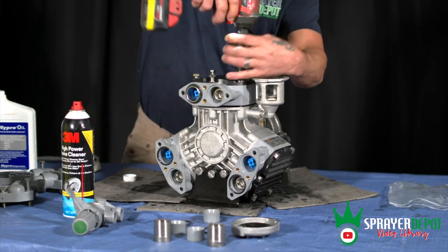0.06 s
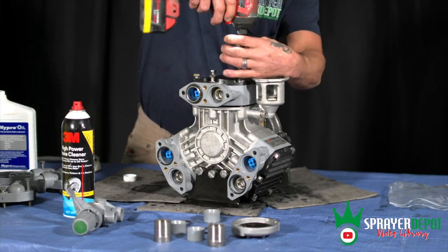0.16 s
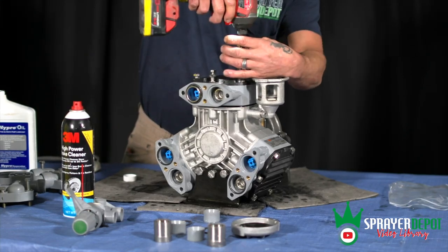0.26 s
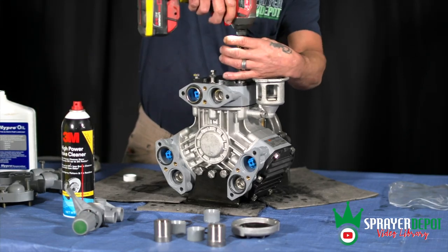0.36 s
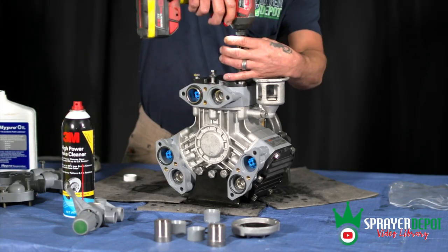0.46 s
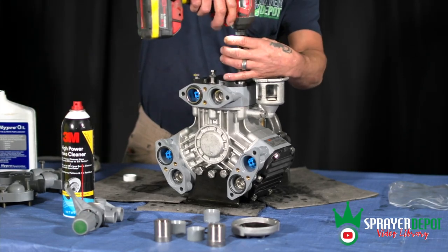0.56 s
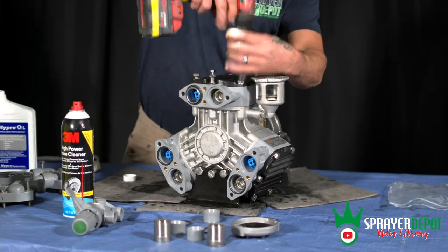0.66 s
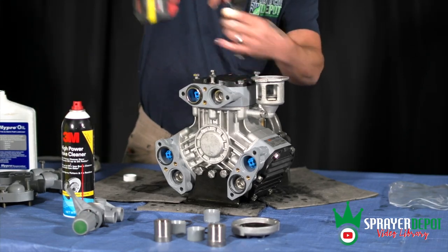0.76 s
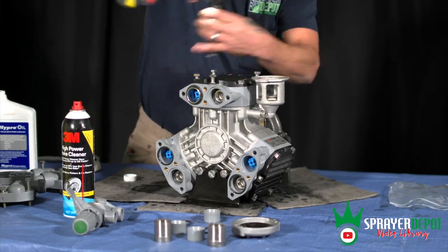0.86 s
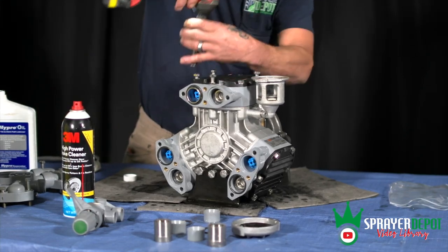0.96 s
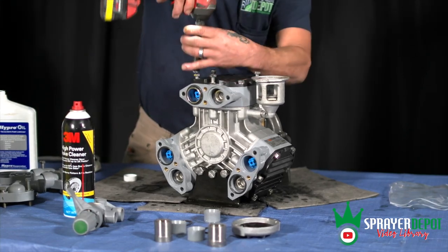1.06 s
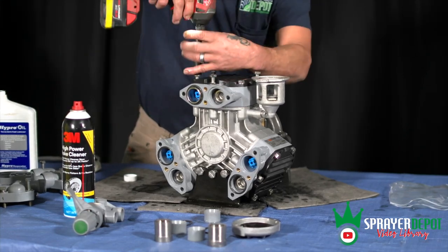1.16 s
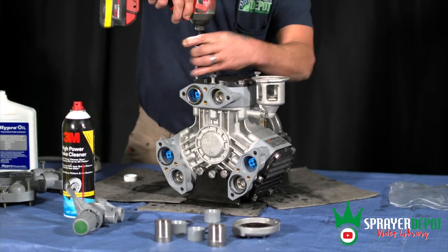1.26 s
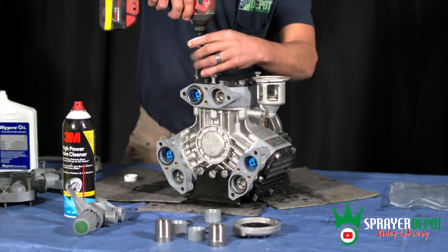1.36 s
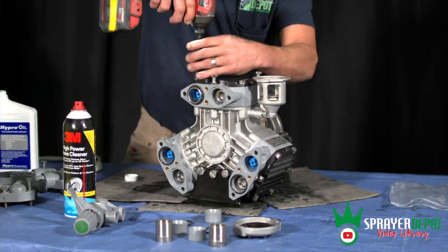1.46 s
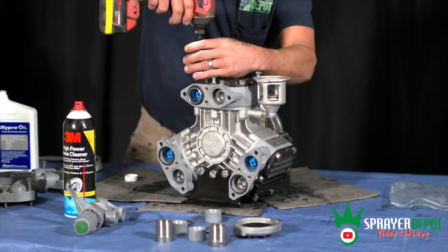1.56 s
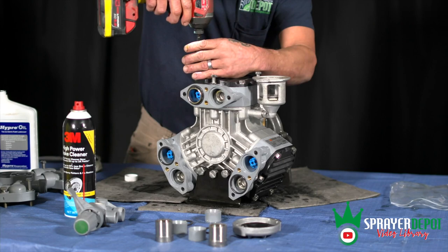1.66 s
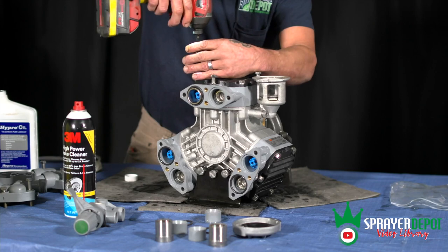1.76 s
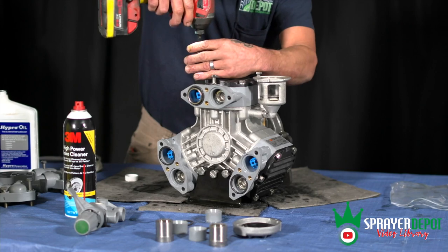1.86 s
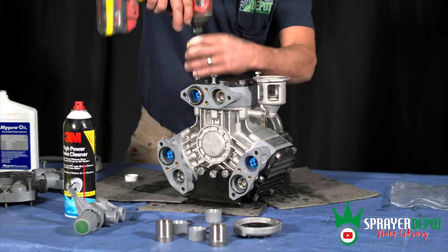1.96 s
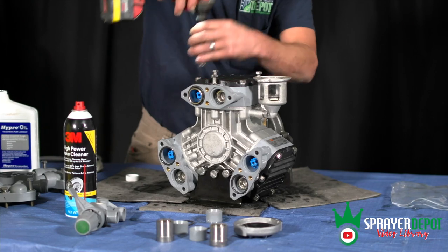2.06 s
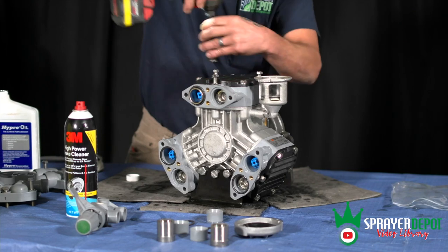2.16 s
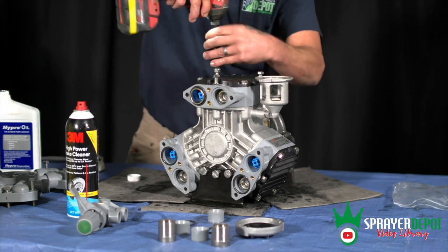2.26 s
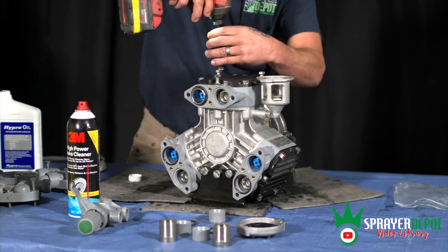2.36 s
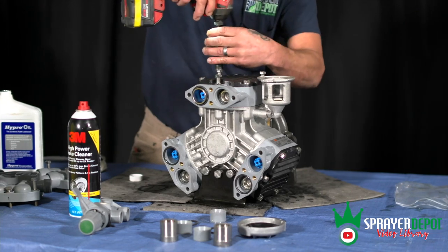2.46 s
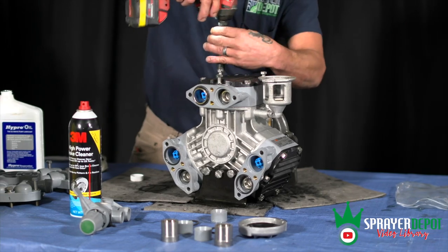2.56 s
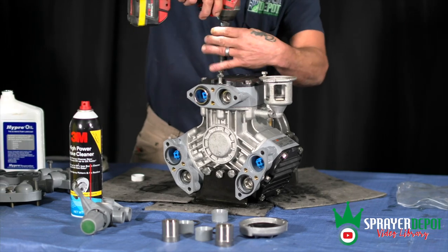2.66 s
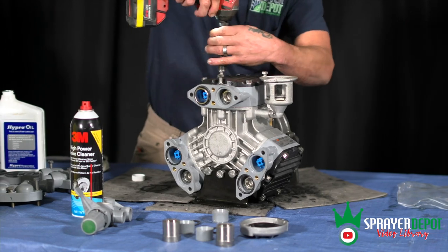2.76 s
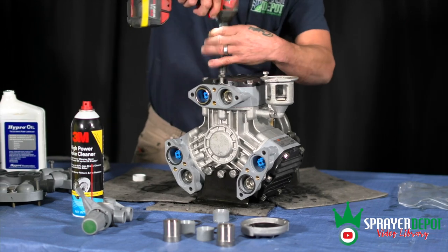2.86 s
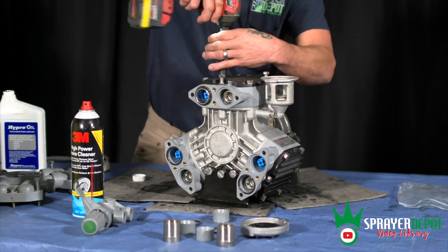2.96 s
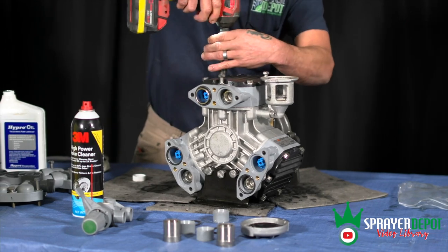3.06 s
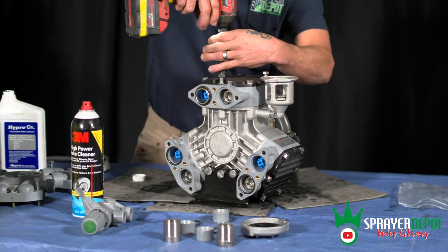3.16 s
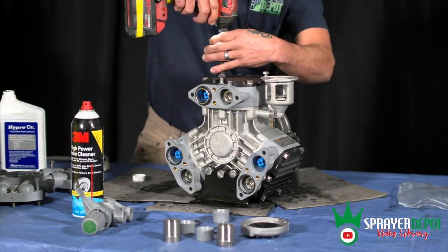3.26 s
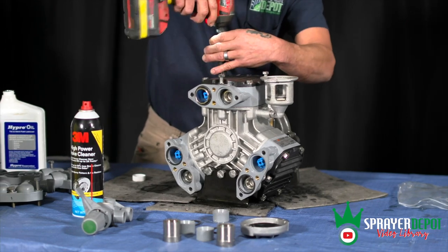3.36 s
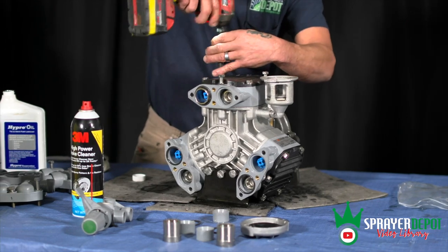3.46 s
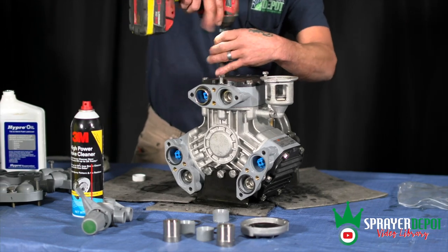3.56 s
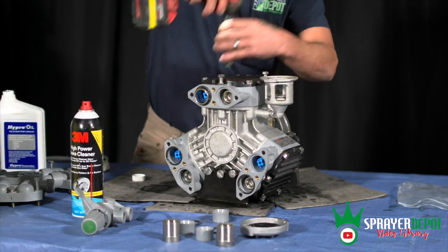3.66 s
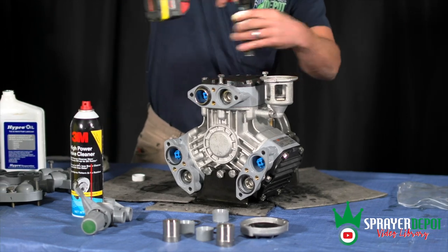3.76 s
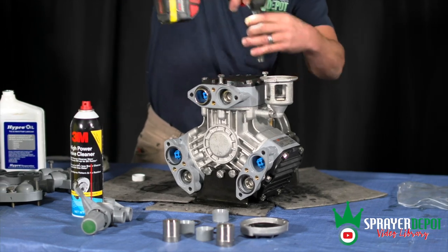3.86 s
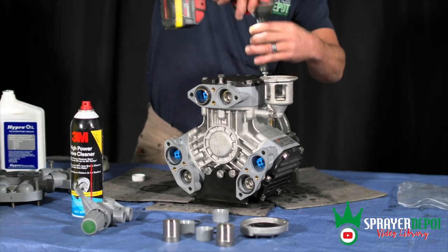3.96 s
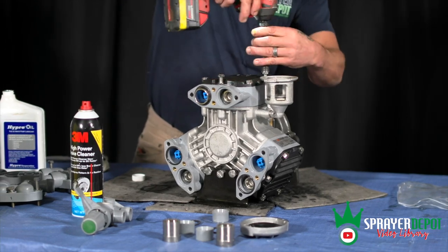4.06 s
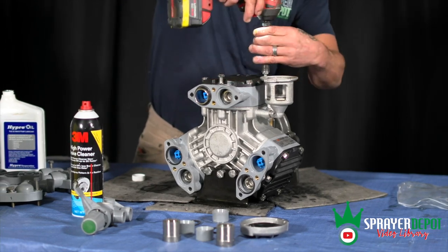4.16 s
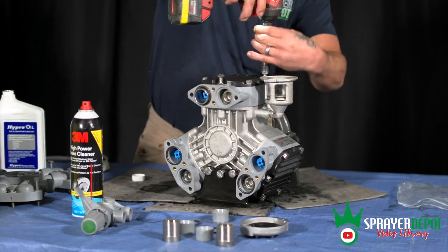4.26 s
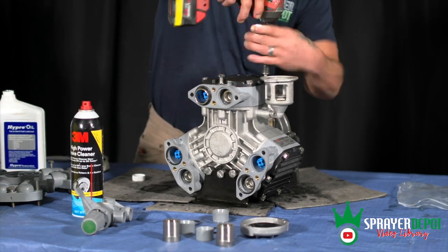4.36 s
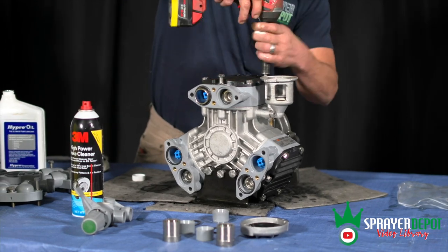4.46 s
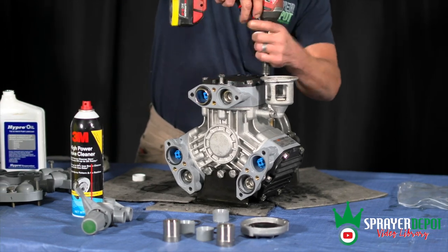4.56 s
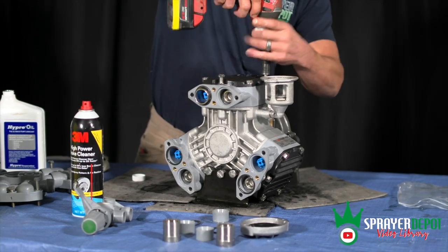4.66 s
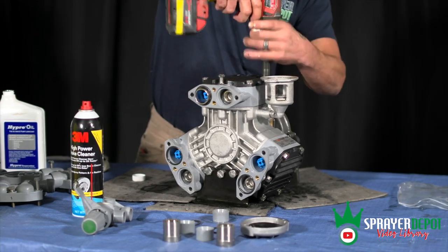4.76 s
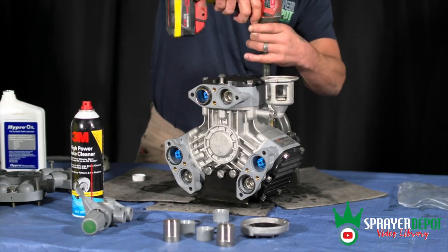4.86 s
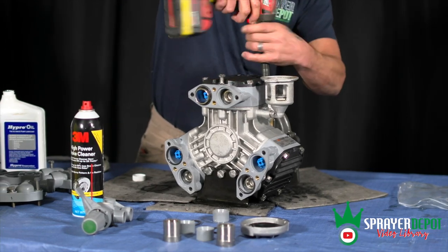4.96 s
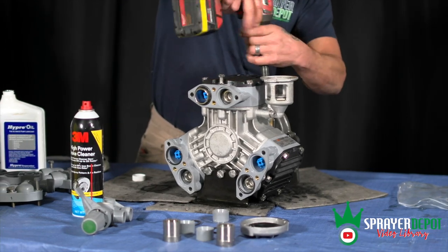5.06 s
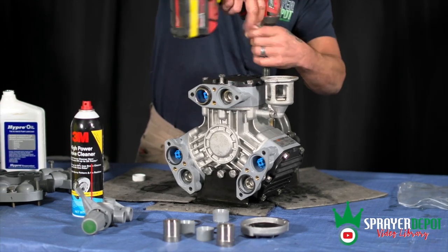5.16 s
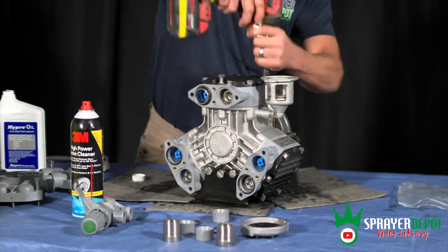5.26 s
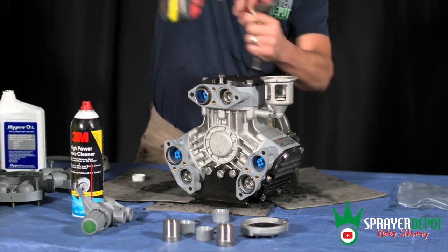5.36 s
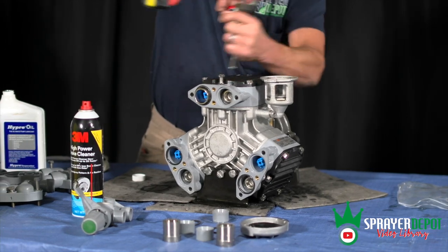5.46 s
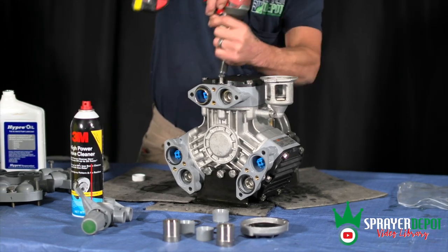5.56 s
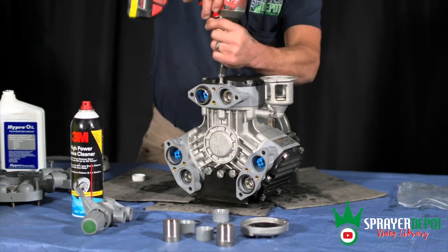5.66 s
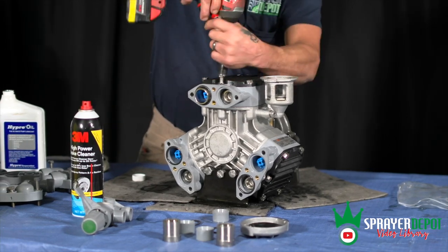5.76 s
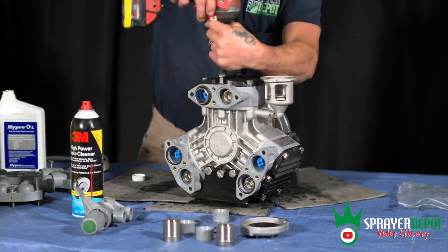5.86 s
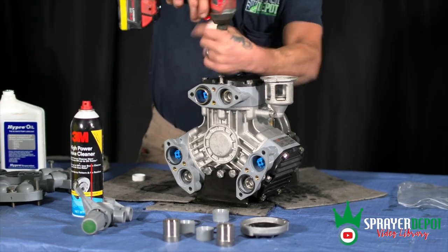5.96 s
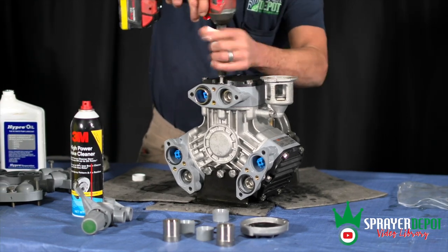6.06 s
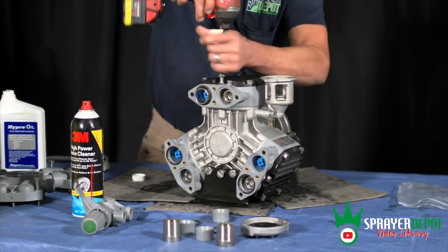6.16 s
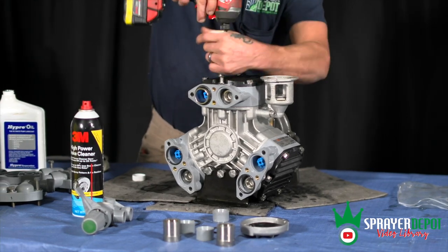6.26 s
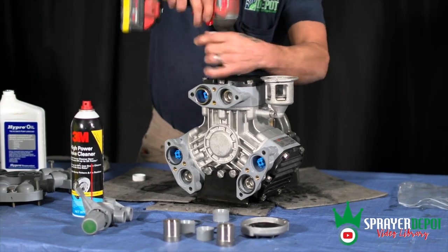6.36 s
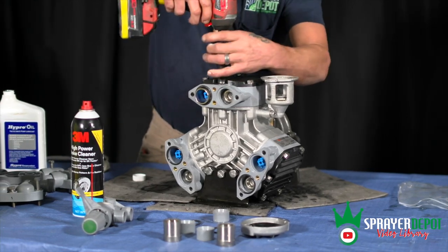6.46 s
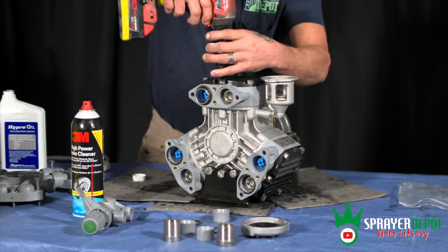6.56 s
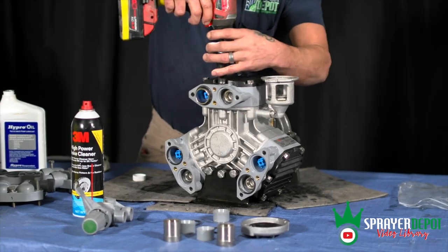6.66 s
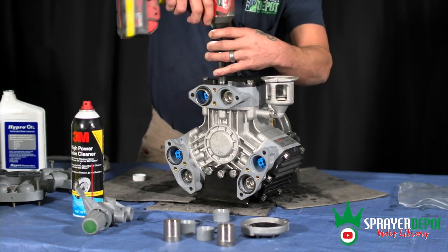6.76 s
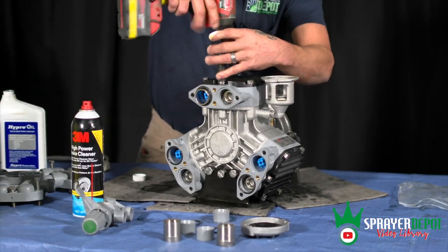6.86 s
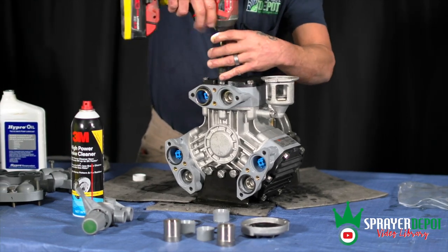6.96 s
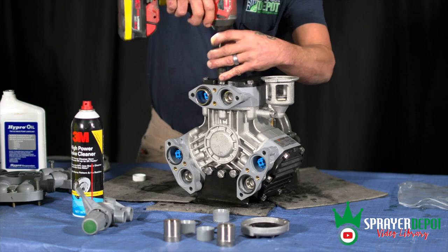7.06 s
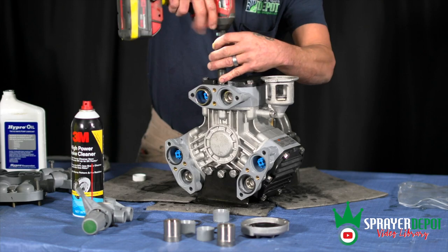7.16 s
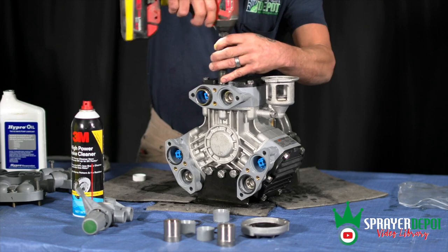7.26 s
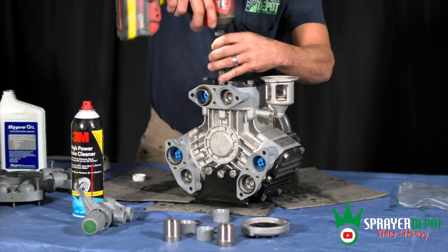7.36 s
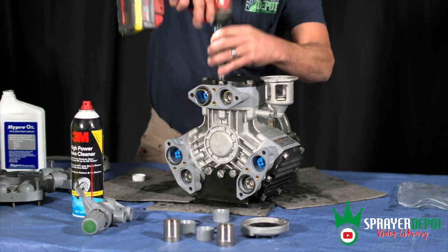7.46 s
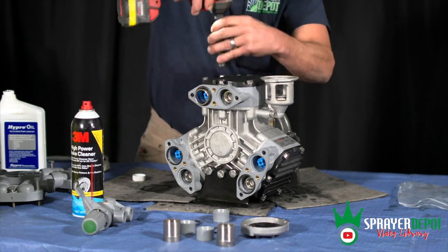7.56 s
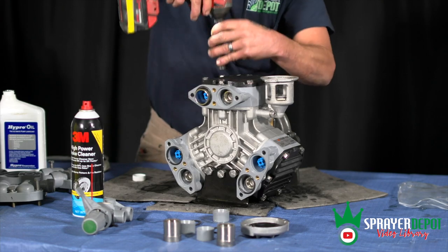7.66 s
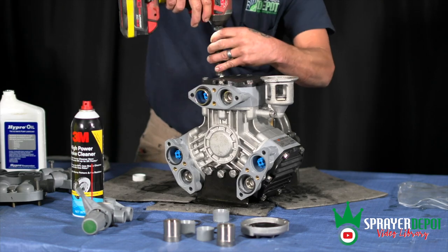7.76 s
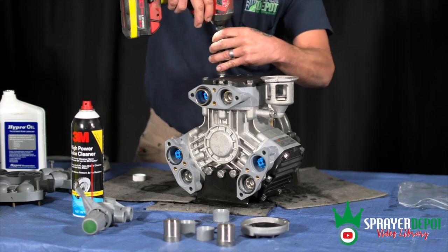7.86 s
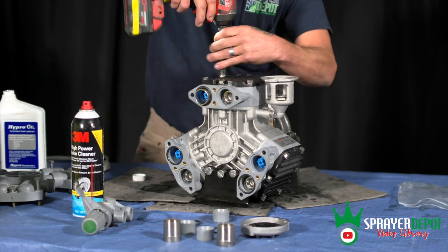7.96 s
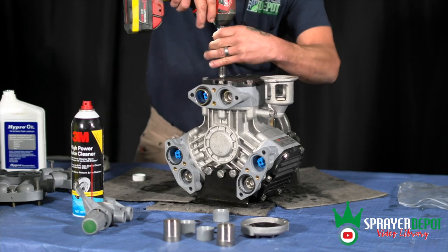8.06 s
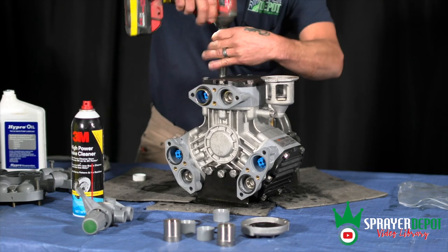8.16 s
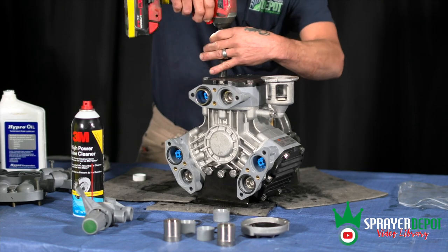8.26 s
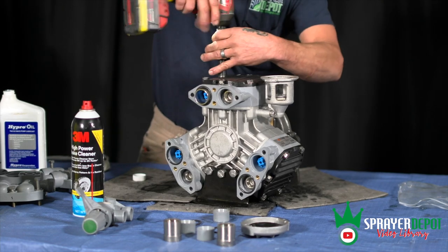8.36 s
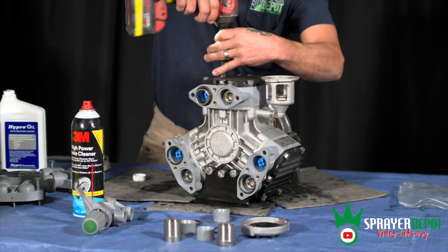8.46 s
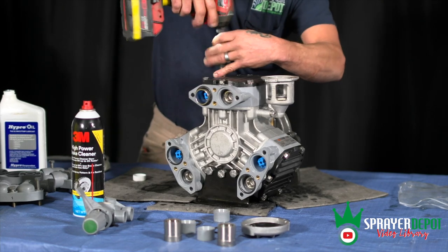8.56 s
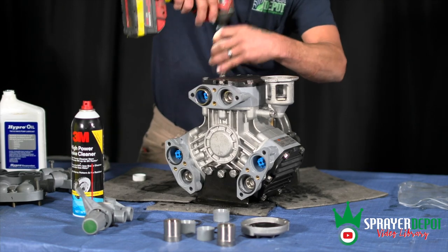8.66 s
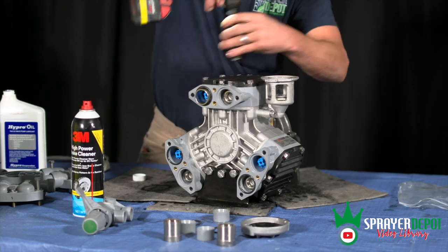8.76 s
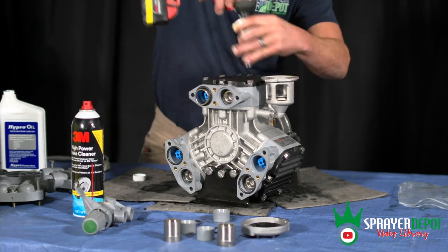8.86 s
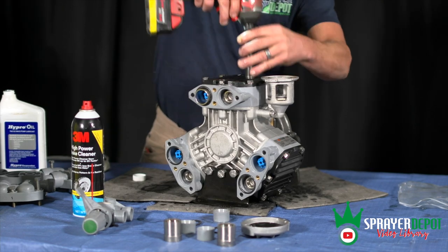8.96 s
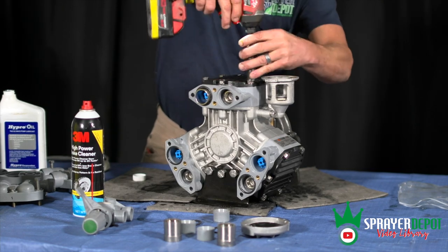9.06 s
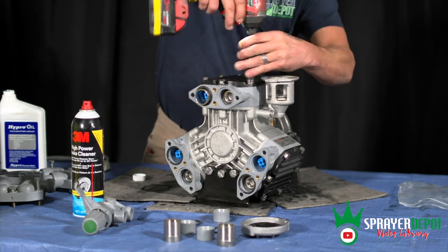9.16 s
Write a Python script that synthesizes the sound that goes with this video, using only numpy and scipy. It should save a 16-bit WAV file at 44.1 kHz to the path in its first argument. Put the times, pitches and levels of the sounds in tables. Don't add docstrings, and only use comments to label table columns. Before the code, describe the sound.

A cordless impact driver works on bolts of a cast metal pump. Each brief pull gives a thin high whistle, a rising motor and gear whir, then a rapid burst of bright steel blows that stops abruptly. Socket clicks and small taps fill the gaps. The early bursts vary from faint to hard, later ones are mostly loud. Close microphone in a large hard-walled workshop, with short echo, slight clipping and faint airflow.

```python
import sys
import numpy as np
from scipy import signal
from scipy.fft import rfft, irfft, next_fast_len
from scipy.io import wavfile

SR = 44100
rng = np.random.default_rng(int(sys.argv[2]) if len(sys.argv) > 2 else 0)


def to_linear_factor(level_db):
    exponent = np.asarray(level_db, float) / 20
    return 10 ** exponent


def materialize(psi):
    bounded = np.clip(np.atleast_2d(psi).T, -1, 1)
    quanta = np.round(bounded * 32767).astype(np.int16)
    wavfile.write(sys.argv[1], SR, quanta)


N = 407043

# f/Hz, level/dB per Hz
AIR = [(15, -56.5), (25, -25), (76, -16), (146, -15.5), (225, -10.5), (495, -10), (552, -8.5), (1000, -12),
       (1210, -22), (1320, -15), (2260, -21.5), (6010, -34.5), (15100, -44), (16400, -52)]
# f/Hz, width/Hz, level/dB rms
FAN_TONES = [(93, 15, -66), (234.3, 15, -65.5), (272.3, 12, -64), (530, 18, -71.5)]
AIR_DB = -56

# f/Hz, t60/s
ROOM_T60 = [(200, 0.21), (530, 0.72), (1390, 0.59), (3680, 0.57), (9700, 0.43)]
# f/Hz, level/dB
ROOM_TONE = [(150, -7), (500, 3), (1500, 5), (4000, 0), (9000, 1), (15000, 1)]
# delay/s, level/dB
BENCH_ECHOES = [(.0034, -5), (.0062, -16)]
PATH_SHIFT_HZ = 90

# t/s, peak/dB, dull part/dB, bright part/dB
TOUCHES = [(0.7407, -33.5, -18, -1.5), (1.1306, -24.5, -11, -10), (1.3945, -24, -9, -8),
           (1.6792, -24, -14, -16), (2.2915, -30, 7.5, 4.5), (2.2954, -21.5, -20, -36), (2.488, -42, 0, -6),
           (4.0285, -30.5, 1.5, 2.5), (4.347, -45, -9.5, -3.5), (4.355, -33, -0.5, -8),
           (4.3653, -43, 7, -19), (4.451, -40, -14.5, -5.5), (5.6374, -40.5, -14, -3.5),
           (5.6546, -35.5, -5, -17), (5.9356, -39, 0.5, 0), (6.2205, -40.5, -9, -19),
           (6.2495, -46.5, 5.5, -25), (6.4101, -21, 3.5, -5.5), (7.796, -25.5, -4, -14),
           (7.9378, -31, -2.5, -9), (8.0283, -40, -10.5, -37.5), (8.107, -48.5, -19, -20),
           (8.2022, -44, -2, -17), (8.2167, -21, -2.5, -5), (8.2183, -13.5, -26, -32), (8.567, -14, -5, 1),
           (9.046, -32.5, 1.5, 3), (9.2244, -25, -14.5, 0.5)]
# t/s, f/Hz, level/dB, t60/s
RINGS = [(1.131, 1523, -43, .05), (1.131, 3747, -44, .03), (1.131, 5050, -40, .02),
         (2.296, 3150, -31, .012), (4.029, 1378, -48, .03), (4.029, 6420, -52, .03), (4.029, 7106, -53, .2),
         (4.029, 7190, -57, .1), (4.45, 11200, -62, .02), (7.799, 4000, -20, .006),
         (8.219, 3200, -15, .0035), (8.219, 4200, -13, .004), (9.045, 7187, -51, .06),
         (9.045, 8118, -51, .06), (9.045, 8930, -46, .15), (9.045, 9060, -48, .08),
         (9.045, 12790, -54, .02), (9.225, 5100, -32, .01), (9.225, 13000, -40, .01)]
# t/s, tick/dB, gap/s, snap/dB
SWITCH = [
    (2.84, -29.5, 0.025, -19.5),
    (4.7074, -24.5, 0.026, -19.5),
    (6.5009, -21, .0288, -14.5),
    (8.2802, -30, .0266, -14),
]
# dull part/dB, bright part/dB
TICK_TONE_DB = (-18, -0.5)
# dull part/dB, bright part/dB
SNAP_TONE_DB = (-13, -10)

# t/s, length/s, level/dB
WHISTLES = [(0, 0.07, -46.5), (0.273, 0.2, -49.5), (1.37, 0.056, -54), (1.67, .07, -49),
            (2.836, .05, -49.5), (3.098, .08, -55), (3.318, .08, -55.5), (4.687, .02, -63),
            (6.503, 0.043, -49.5), (7.094, 0.035, -53), (7.302, .04, -42), (8.273, 0.054, -49),
            (8.547, 0.066, -42)]
WHISTLE_FROM_HZ, WHISTLE_TO_HZ, WHISTLE_CLIMB_S = 8020, 9450, .06

# start t/s, bolt bites t/s, release t/s, top gear mesh f/Hz
PULLS = [(-.019, .119, .15, 5300), (.277, .40, .52, 3750), (1.365, 1.503, 1.54, 5650),
         (1.67, 1.74, 1.81, 4000), (2.824, 2.945, 3.03, 5350), (3.1, 3.17, 3.24, 3600),
         (3.312, 3.397, 3.55, 5600), (4.69, 4.939, 5.08, 6270), (6.49, 6.741, 6.91, 6220),
         (7.08, 7.128, 7.24, 4000), (7.32, 7.365, 7.44, 4000), (8.285, 8.33, 8.42, 4000),
         (8.54, 8.594, 8.66, 4000)]
PULL_DB = [-23.5, -27.5, -25, -25, -24, -33, -21, -22.5, -23, -20, -22.5, -18.5, -21.5]
SPIN_UP_S_PER_HZ, SPIN_UP_BEND = 1.27e-5, 2.0
SAG_PER_S, LOAD_DB_PER_S = 4.5, 30.5
WHIR_LAW, BRAKE_DB_PER_S = 0.66, 599

GROAN_HZ, GROAN_WIDTH_HZ, GROAN_DB = 1480, 320, -4
GROAN_FROM_HZ, GROAN_UNTIL_HZ, GROAN_SPAN_HZ = 2000, 5150, 250

# multiple of mesh f, level/dB
MESH_ORDERS = [(1, -1.5), (.6, -3.5), (1.3, -12)]
TONE_DB, TONE_LAW, TONE_LOSS_DB_PER_S = -36, 1.5, 250
WOBBLE, STEADY_HZ = .045, 6400

# f/Hz, level/dB per Hz
WHIR = [(71, -57), (120, -27), (213, -3), (402, -19.5), (535, -12), (1190, -7), (1370, -4.5), (2200, -5.5),
        (2810, -3.5), (7980, -5.5), (16000, -37.5)]
# f/Hz, width/Hz, level/dB
HOUSING = [(750, 169, 6), (1703, 69, -9), (2940, 2100, -7.5), (3590, 360, 0), (5085, 440, -8),
           (8380, 800, -12.5)]
HISS_DB = -4.5
RATTLE_DB, RATTLE_S, RATTLE_HISS_DB = -27.5, 0.047, -3

# first t/s, last t/s, blows, peak/dB, slowing at the end
BURSTS = [(0.504, 0.515, 2, 1, 0), (1.505, 1.554, 4, -12.5, -0.26), (1.763, 1.783, 3, -1.5, 0.1),
          (2.966, 3.014, 4, -19.5, 0), (3.4, 3.527, 9, 3, .2), (4.938, 5.065, 9, 2, .55),
          (6.739, 6.891, 9, 0.5, .75), (7.128, 7.25, 8, 0.04, 0.3), (7.368, 7.425, 5, 0.74, -.1),
          (8.33, 8.403, 5, 2, .2), (8.589, 8.646, 5, -0.7, .4)]
# t/s, peak/dB
GLANCES = [
    (0.118, -14),
    (.133, -12),
    (.155, -14),
    (.191, -23.5),
    (7.122, -6.5),
    (7.36, -2),
    (8.325, 0.5),
    (8.586, 0),
]
FIRST_GAP_EXTRA, CATCH_UP_BLOWS = .4, 1.3
TIRE_DB, BRIGHT_DB, DULLING_DB = 4.5, -14, 3
LIGHT_IS_BRIGHT = .35
BLOW_SCATTER_DB, BRIGHT_SCATTER_DB, MODE_SCATTER_DB = 1.0, 1.8, 1.5
# f/Hz, level/dB, t60/s
ANVIL = [(201, -19.5, 0.024), (487, -29.5, .01), (835, -19, .008), (1037, -16.5, 0.018), (1410, -18, 0.039),
         (1886, -8, 0.0089), (2375, -9, 0.017), (2623, -3.5, 0.011), (3386, 1, 0.0064), (3930, 3, 0.005),
         (4630, 5, 0.0043), (5320, 2.5, 0.0035), (6500, 0.5, 0.0028), (7240, 3, 0.0023), (7930, 3, 0.0041),
         (9100, -20.5, 0.0066), (11800, -29.5, 0.001), (12100, -18.5, 0.0038), (14920, -23.5, .002)]


def rms_one(x):
    return x / np.sqrt(np.mean(x ** 2) + 1e-20)


def at_hz(points, hz):
    table = np.array(points)
    return np.interp(np.log(np.maximum(hz, 1)), np.log(table[:, 0]), table[:, 1])


def colour(x, spectrum):
    size = next_fast_len(len(x))
    gain = to_linear_factor(at_hz(spectrum, np.fft.rfftfreq(size, 1 / SR)))
    return rms_one(irfft(rfft(x, size) * gain, size)[:len(x)])


def resonate(x, hz, width_hz):
    r = np.exp(-np.pi * width_hz / SR)
    zeros = np.array([1, 0, -1]) * (1 - r * r) / 2
    return signal.lfilter(zeros, [1, -2 * r * np.cos(2 * np.pi * hz / SR), r * r], x)


def ring(clicks, hz, t60):
    r, w = to_linear_factor(-60 / (t60 * SR)), 2 * np.pi * hz / SR
    return signal.lfilter([0, np.sin(w)], [1, -2 * r * np.cos(w), r * r], clicks + 1e-18)


def smear(clicks, decay_s):
    return signal.lfilter([1], [1, -np.exp(-1 / (decay_s * SR))], clicks + 1e-18)


def butter(x, order, edges_hz, kind):
    return signal.sosfilt(signal.butter(order, edges_hz, kind, fs=SR, output="sos"), x)


def wander(rate_hz):
    r = np.exp(-2 * np.pi * rate_hz / SR)
    return rms_one(signal.lfilter([1], [1, -2 * r, r * r], rng.standard_normal(N)))


def ventilation():
    out = to_linear_factor(AIR_DB + 0.55 * wander(1.5)) * colour(rng.standard_normal(N), AIR)
    for hz, width_hz, db in FAN_TONES:
        out += to_linear_factor(db) * rms_one(resonate(rng.standard_normal(N), hz, width_hz))
    return out


def room_response(wet_db, build_s):
    t, tail = np.arange(SR) / SR, 0
    white = rng.standard_normal((2, SR))
    edges_hz = 70 * 2 ** np.arange(0, 8.1, .5)
    for k, (low, high) in enumerate(zip(edges_hz, edges_hz[1:])):
        band = butter(white[k % 2], 2, [low, high], "band")
        hz = np.sqrt(low * high)
        tail = tail + band * to_linear_factor(at_hz(ROOM_TONE, hz) - t / at_hz(ROOM_T60, hz) * 60)
    tail *= 1 - np.exp(-(t / build_s) ** 2)
    tail *= 1 + 0.15 * np.exp(-t / 0.02)
    return to_linear_factor(wet_db) * tail / np.sqrt(np.sum(tail ** 2))


def workshop(x):
    out = x.copy()
    for delay_s, db in BENCH_ECHOES:
        delay = round(delay_s * SR)
        out[delay:] += to_linear_factor(db) * x[:-delay]
    aims = np.array([wander(PATH_SHIFT_HZ) for _ in range(4)])
    for aim in aims / np.sqrt(np.sum(aims ** 2, axis=0)):
        out += signal.fftconvolve(x * aim, room_response(wet_db=-1.0, build_s=0.011))[:N]
    return out


def touches():
    out, t = np.zeros(N + SR), np.arange(SR // 3) / SR
    ticks = [(s, db, *TICK_TONE_DB) for s, db, _, _ in SWITCH]
    snaps = [(s + gap, db, *SNAP_TONE_DB) for s, _, gap, db in SWITCH]
    bands_hz = [2160, 4480], [194, 1680], [5750, 8930]
    for s, peak_db, dull_db, bright_db in [*TOUCHES, *ticks, *snaps]:
        scuff = to_linear_factor(-25) * rng.standard_normal(len(t)) * np.exp(-t / .005)
        scuff[0] = 1
        parts = [butter(scuff, 2, edges_hz, "band") for edges_hz in bands_hz]
        middle, dull, bright = [part / np.abs(part).max() for part in parts]
        sound = middle - to_linear_factor(dull_db) * dull - to_linear_factor(bright_db) * bright
        i = round(s * SR)
        out[i:i + len(t)] += to_linear_factor(peak_db + 2.5) * sound
    for s, hz, db, t60 in RINGS:
        i = round(s * SR)
        out[i:i + len(t)] += to_linear_factor(db - t / t60 * 60) * np.sin(2 * np.pi * hz * t)
    return out[:N]


def whistle():
    out = np.zeros(N)
    for start_s, length_s, db in WHISTLES:
        travel = np.arange(round(length_s * SR)) / (length_s * SR)
        climb = 1 - np.exp(-travel * length_s / WHISTLE_CLIMB_S)
        hz = WHISTLE_FROM_HZ + (WHISTLE_TO_HZ - WHISTLE_FROM_HZ) * climb
        shape = np.minimum(1, 12 * travel) * np.minimum(1, 5 * (1 - travel))
        i = max(round(start_s * SR), 0)
        out[i:i + len(hz)] += to_linear_factor(db) * shape * np.sin(2 * np.pi * np.cumsum(hz) / SR)
    return out


def drive():
    t = np.arange(N) / SR
    rows = np.column_stack([PULLS, PULL_DB])
    pull = np.maximum(np.searchsorted(rows[:, 0], t) - 1, 0)
    start_s, bite_s, release_s, top_hz, db = rows[pull].T
    spin_up_s = SPIN_UP_S_PER_HZ * top_hz
    share = 1 - np.exp(-(np.abs(t - start_s) / spin_up_s) ** SPIN_UP_BEND) + 1e-4
    loaded_s = np.maximum(t - bite_s, 0)
    braked_s = np.maximum(t - release_s, 0)
    whir_db = db + 20 * WHIR_LAW * np.log10(share) - BRAKE_DB_PER_S * braked_s - LOAD_DB_PER_S * loaded_s
    return top_hz * share * np.exp(-SAG_PER_S * loaded_s), whir_db, loaded_s


def groan(mesh_hz, whir_db):
    knocks = rng.standard_normal(N) * to_linear_factor(4.0 * wander(100))
    below = 1 / (1 + np.exp((mesh_hz - GROAN_UNTIL_HZ) / GROAN_SPAN_HZ))
    above = 1 / (1 + np.exp((GROAN_FROM_HZ - mesh_hz) / GROAN_SPAN_HZ))
    for _ in range(2):
        knocks = resonate(knocks, GROAN_HZ, GROAN_WIDTH_HZ)
    return below * above * to_linear_factor(whir_db + GROAN_DB - 7) * rms_one(knocks)


def gears(mesh_hz, loaded_s):
    tone_db = TONE_DB + 20 * TONE_LAW * np.log10(mesh_hz / 6200) - TONE_LOSS_DB_PER_S * loaded_s
    uneven = 1 + WOBBLE * (1 - mesh_hz / STEADY_HZ) * wander(130)
    phase = 2 * np.pi * np.cumsum(mesh_hz * uneven) / SR
    tones = sum(to_linear_factor(db + 2.5 * wander(70)) * np.sin(order * phase) for order, db in MESH_ORDERS)
    tones = to_linear_factor(tone_db) * tones
    return to_linear_factor(3) * (tones + to_linear_factor(5.5) * resonate(tones, 2850, 450))


def motor(whir_db, blow_s, blow_db):
    jolts = np.zeros(N)
    jolts[(blow_s * SR).astype(int)] = to_linear_factor(blow_db + RATTLE_DB)
    shaken = smear(jolts, RATTLE_S)
    grit = rng.standard_normal(N) * to_linear_factor(3.33 * wander(280))
    whir = colour(grit, WHIR)
    dull = butter(whir, 2, 4200, "low")
    hiss = whir - dull
    bare = (to_linear_factor(whir_db) + shaken) * dull
    bare += (to_linear_factor(whir_db + HISS_DB) + to_linear_factor(RATTLE_HISS_DB) * shaken) * hiss
    return bare + sum(to_linear_factor(db) * resonate(bare, hz, width_hz) for hz, width_hz, db in HOUSING)


def blows():
    s, db = map(list, zip(*GLANCES))
    late = [.5] * len(s)
    for first_s, last_s, count, peak_db, slowing in BURSTS:
        k = np.arange(round(count))
        place = k / k[-1]
        gaps = 1 + FIRST_GAP_EXTRA * np.exp(-k[:-1] / CATCH_UP_BLOWS) + slowing * place[1:] ** 3
        s += list(first_s + (last_s - first_s) * np.append(0, np.cumsum(gaps)) / gaps.sum())
        late += list(place)
        db += list(peak_db - TIRE_DB * place ** 2)
    s, db, late = np.array(s), np.array(db), np.array(late)
    luck = rng.standard_normal((2, len(s)))
    bright_db = BRIGHT_DB - DULLING_DB * late - LIGHT_IS_BRIGHT * db + BRIGHT_SCATTER_DB * luck[1]
    return s, db + BLOW_SCATTER_DB * luck[0], bright_db


def hammer(blow_s, peak_db, bright_db):
    at = np.round((blow_s + .0008) * SR).astype(int)
    luck = rng.standard_normal((len(blow_s), len(ANVIL)))
    shake, out = rng.standard_normal((2, N)), np.zeros(N)
    for k, (hz, db, t60) in enumerate(ANVIL):
        top_db = (bright_db + 12.5) * (hz > 5900)
        clicks = np.zeros(N)
        clicks[at] = to_linear_factor(peak_db + db - 11.5 + top_db + MODE_SCATTER_DB * luck[:, k])
        clicks[at] *= np.sign(luck[:, k - 1] + 1.1)
        rattle = to_linear_factor(-17) * shake[k % 2] * smear(np.abs(clicks), .0022)
        out += ring(clicks * (-1) ** k + rattle, hz, t60)
    return butter(out, 2, 480, "high")


def scene():
    mesh_hz, whir_db, loaded_s = drive()
    blow_s, blow_db, bright_db = blows()
    tool = touches() + whistle() + groan(mesh_hz, whir_db) + gears(mesh_hz, loaded_s)
    tool += to_linear_factor(-7) * motor(whir_db, blow_s, blow_db)
    tool += hammer(blow_s, blow_db, bright_db)
    return (workshop(butter(tool, 3, 125, "high")) + ventilation())[None]


def top_cut(x):
    return signal.sosfilt(signal.butter(12, 16570, fs=SR, output="sos"), x)


def record(dry):
    ceiling, cutoff_hz = 0.93, 16900
    loud = dry / (1 + np.abs(dry / ceiling) ** 6) ** (1 / 6)
    mix = signal.sosfilt(signal.cheby2(10, 50, cutoff_hz, fs=SR, output="sos"), loud)
    return top_cut(mix)


dry = scene()
out = record(dry)
materialize(out)
```